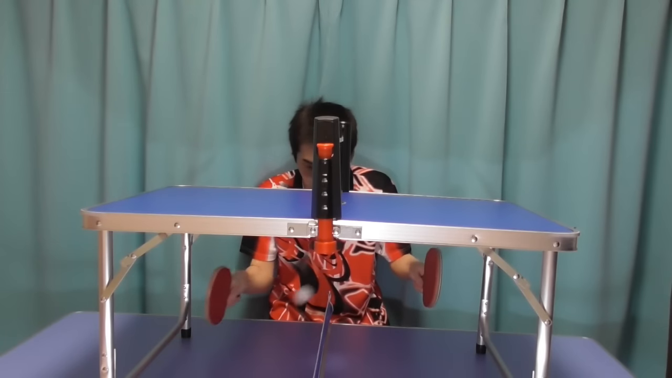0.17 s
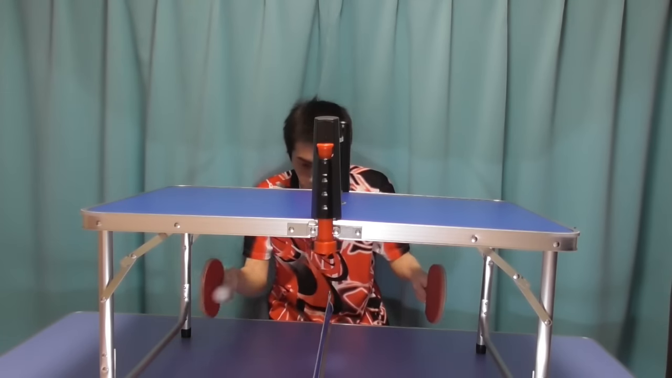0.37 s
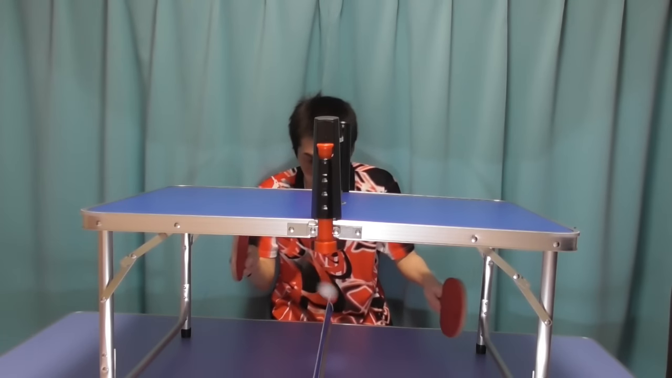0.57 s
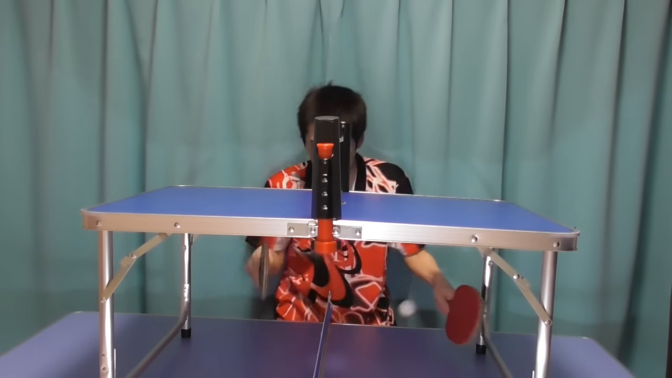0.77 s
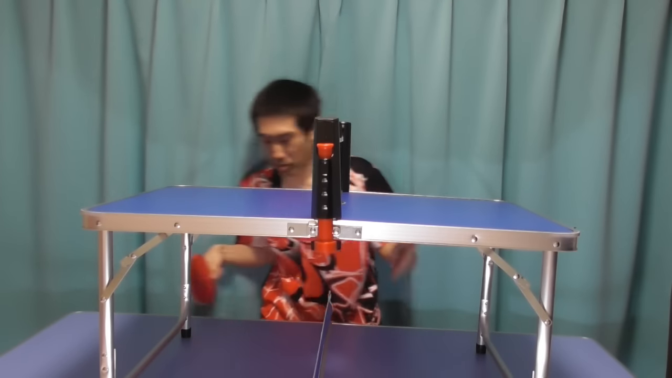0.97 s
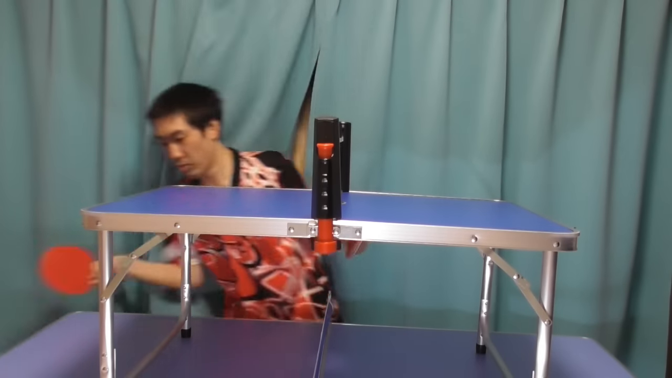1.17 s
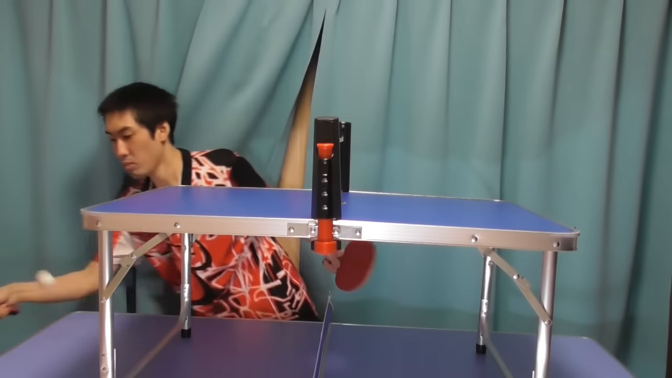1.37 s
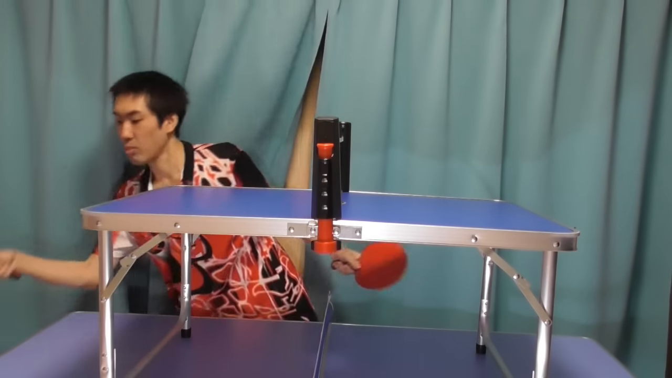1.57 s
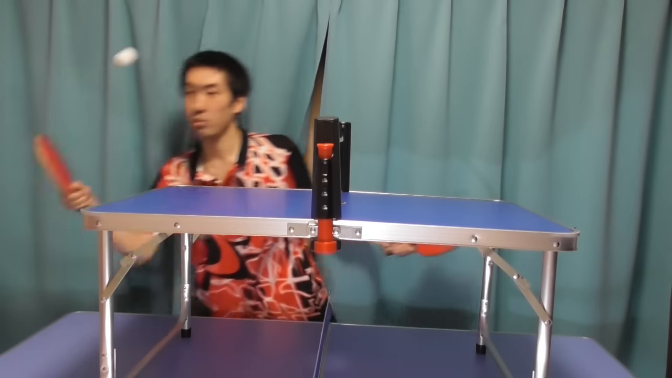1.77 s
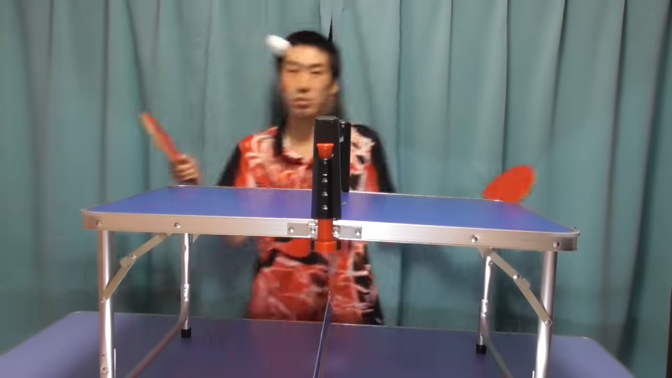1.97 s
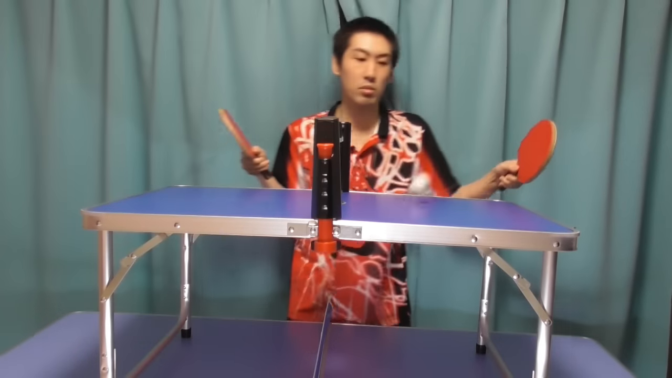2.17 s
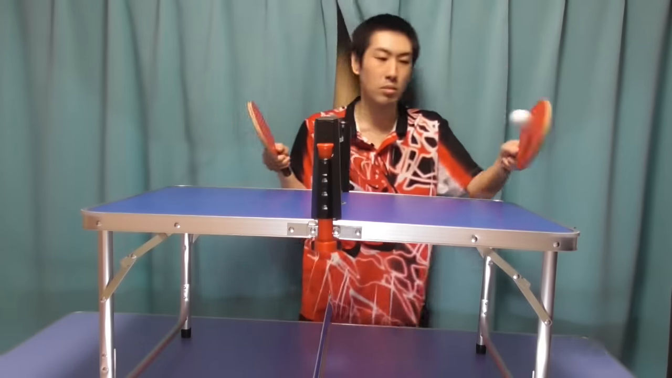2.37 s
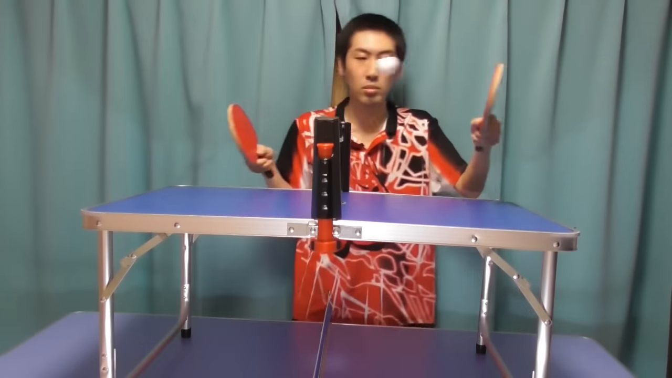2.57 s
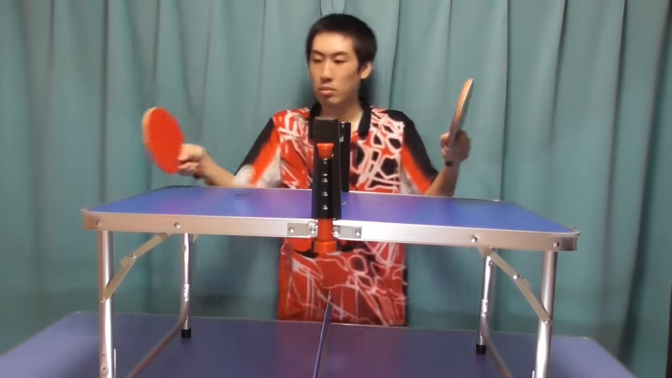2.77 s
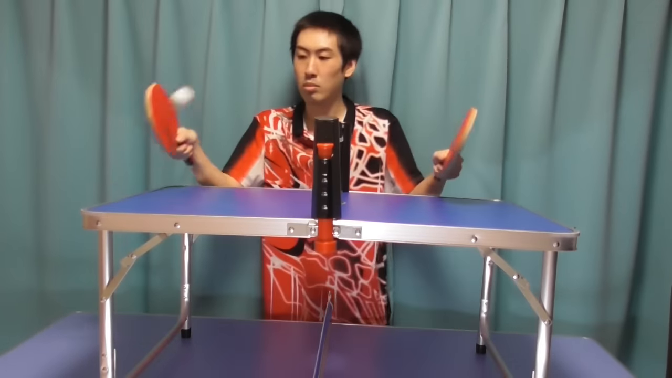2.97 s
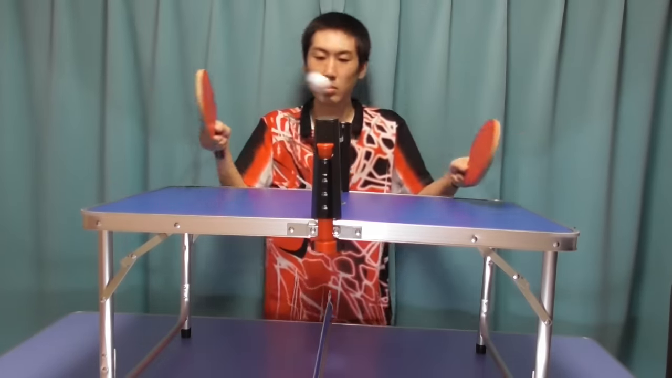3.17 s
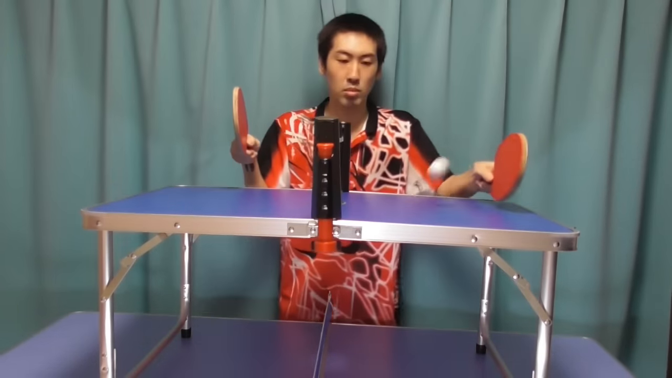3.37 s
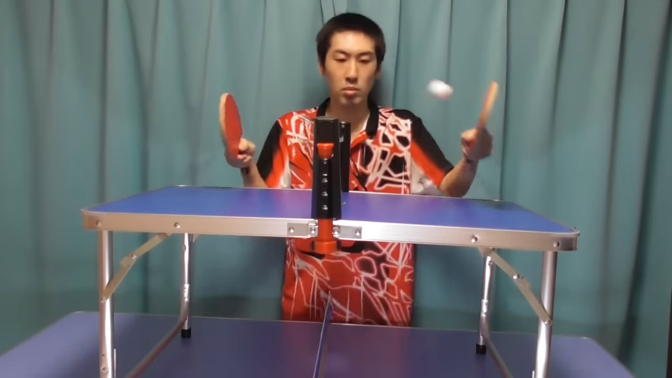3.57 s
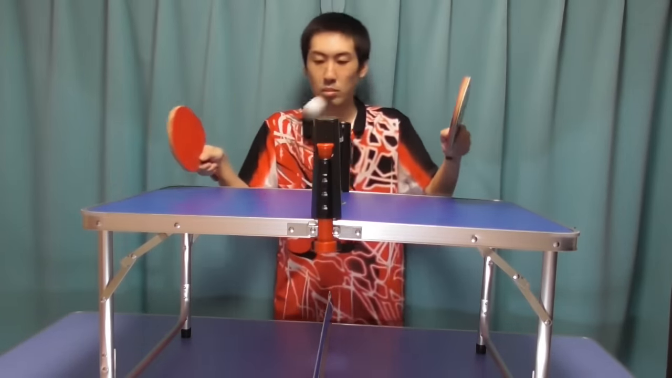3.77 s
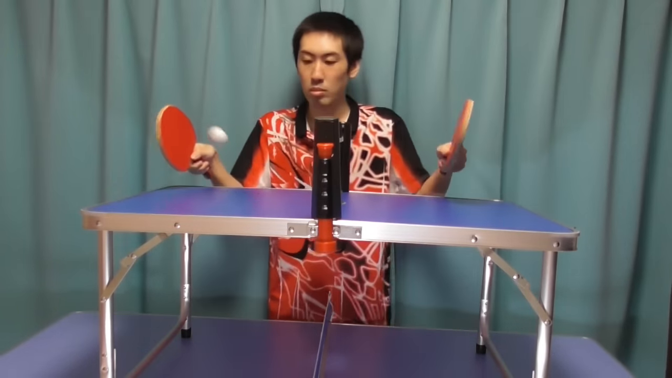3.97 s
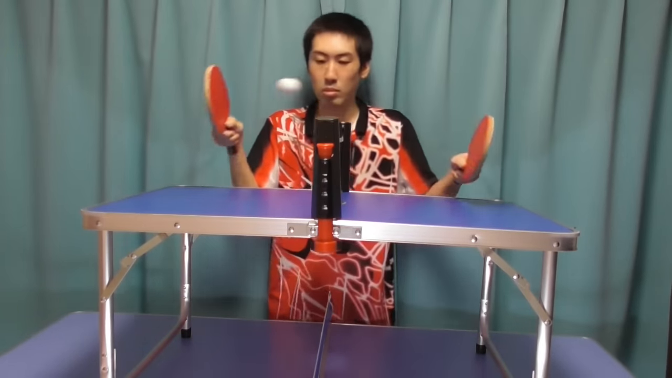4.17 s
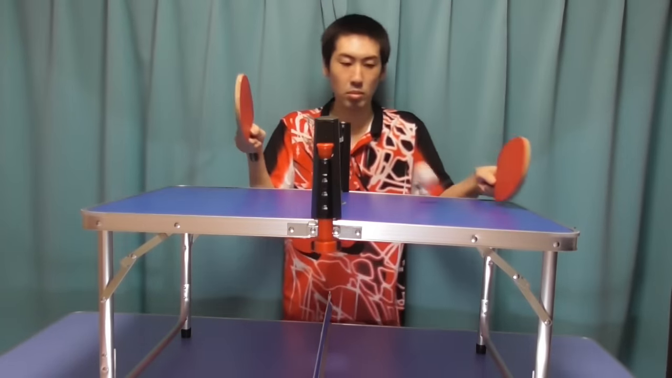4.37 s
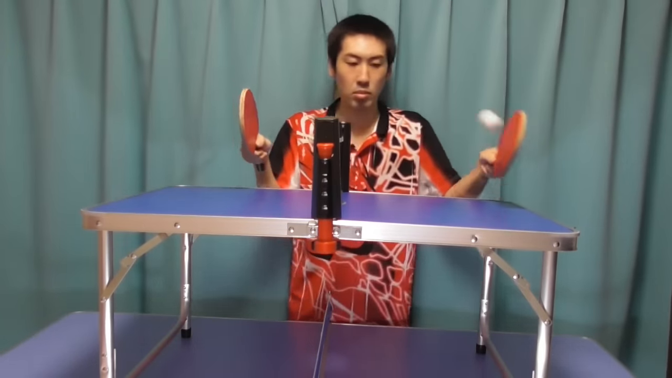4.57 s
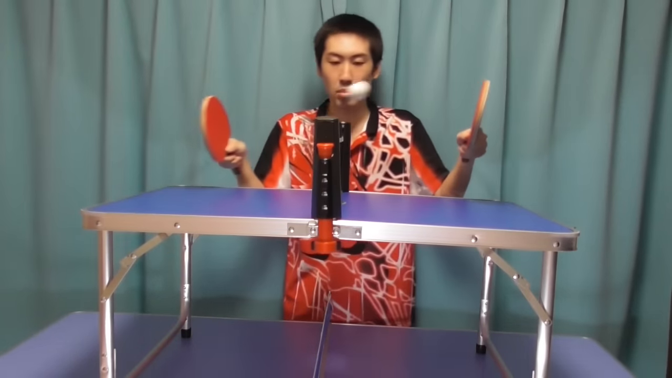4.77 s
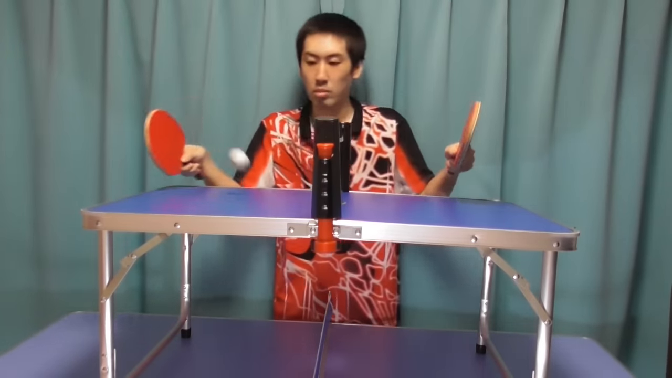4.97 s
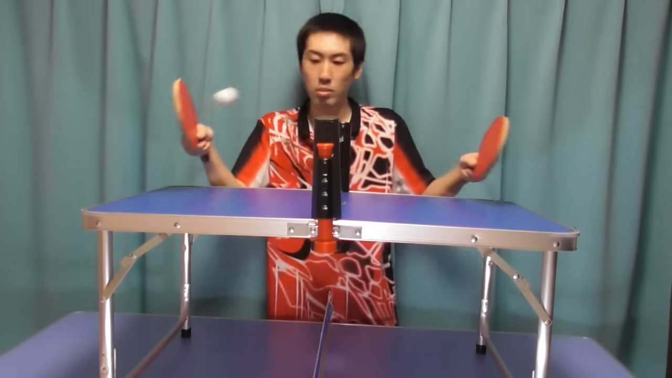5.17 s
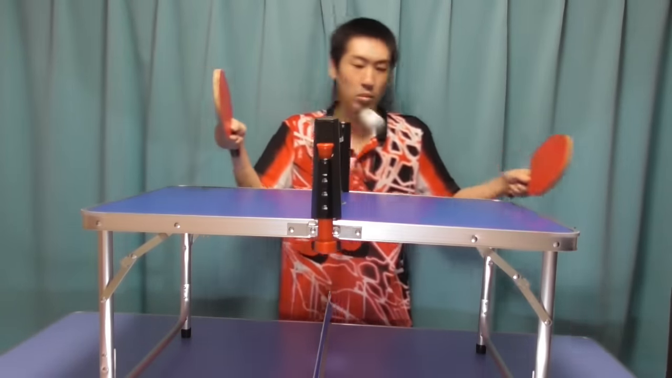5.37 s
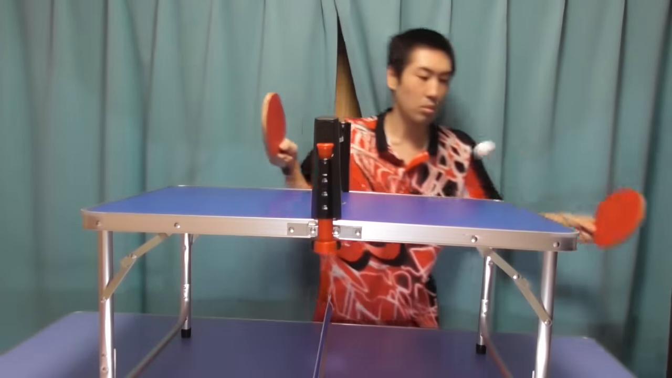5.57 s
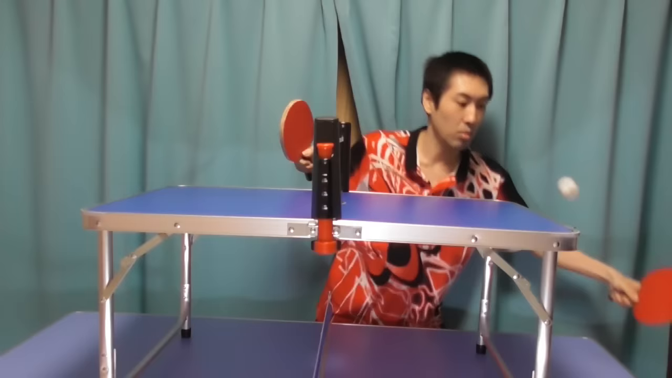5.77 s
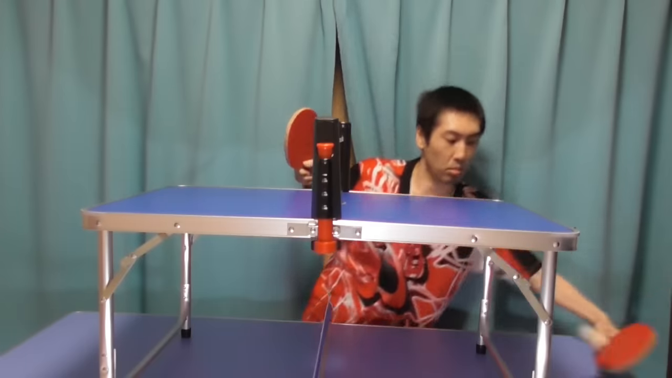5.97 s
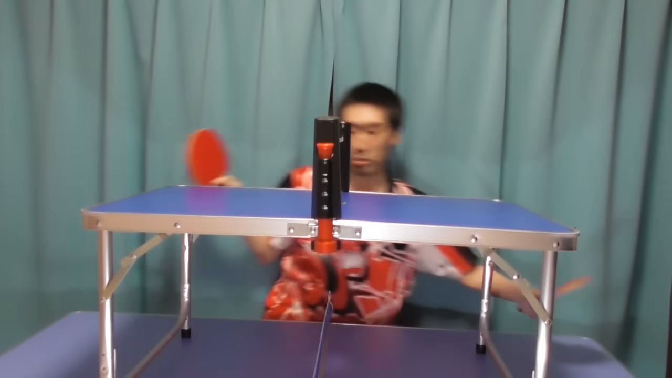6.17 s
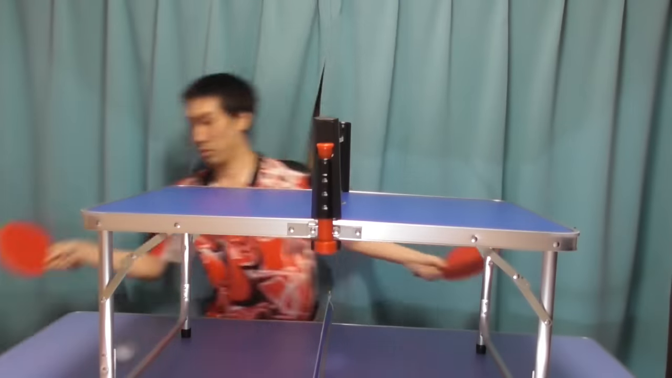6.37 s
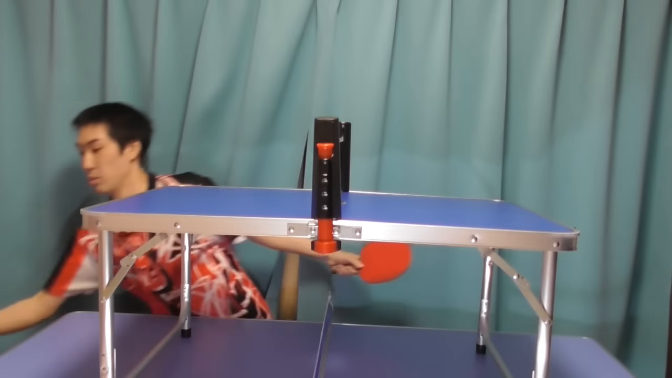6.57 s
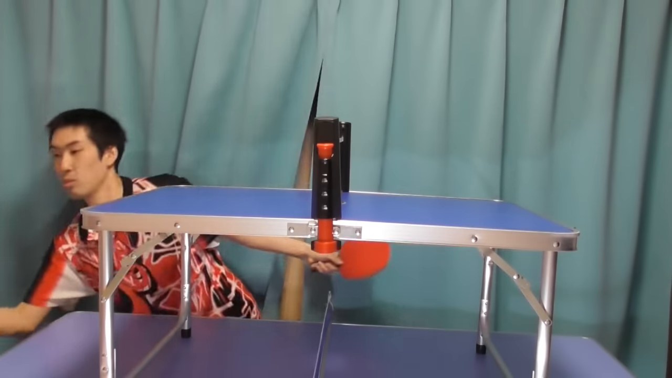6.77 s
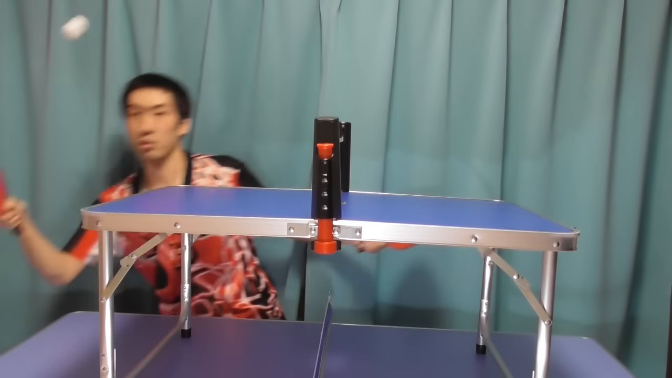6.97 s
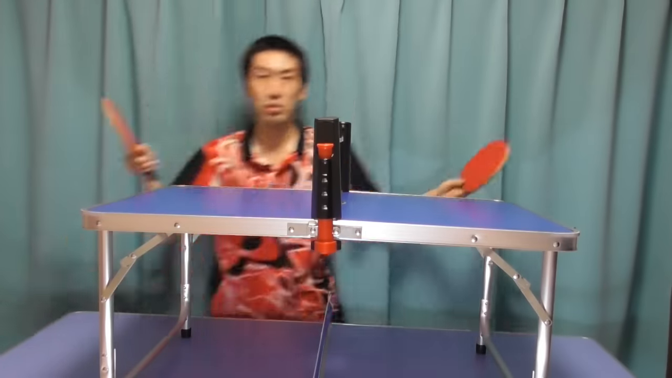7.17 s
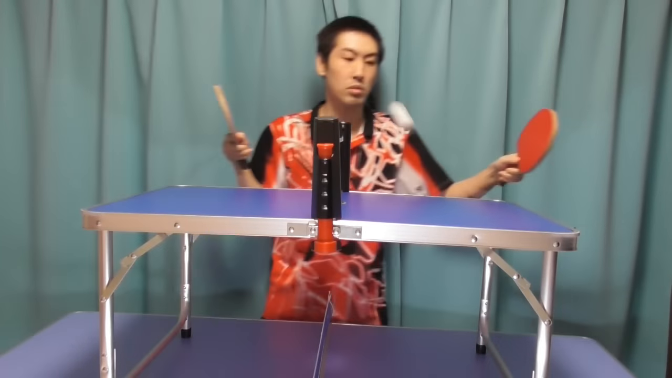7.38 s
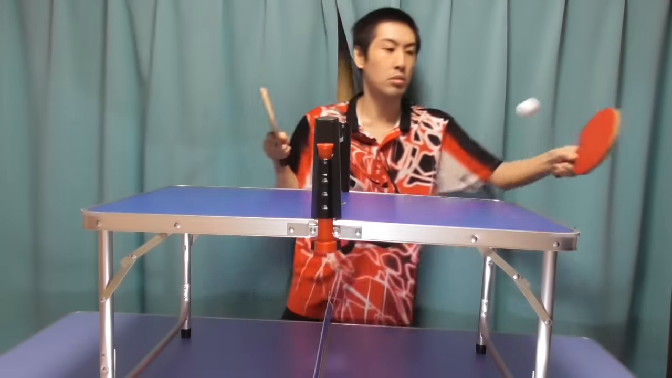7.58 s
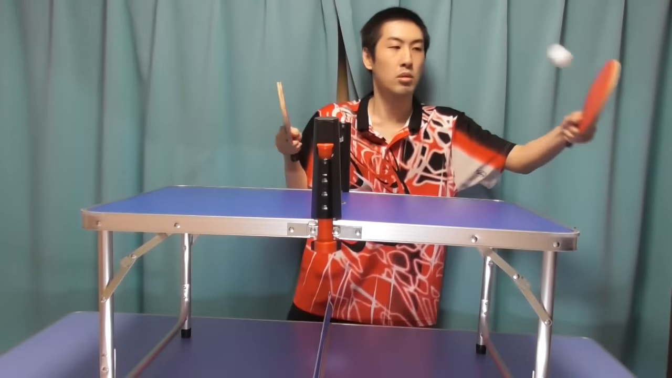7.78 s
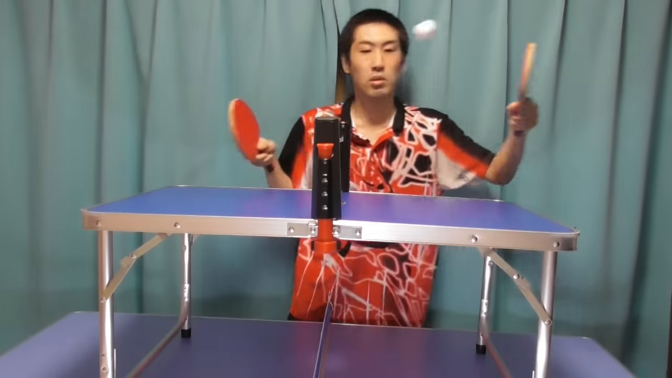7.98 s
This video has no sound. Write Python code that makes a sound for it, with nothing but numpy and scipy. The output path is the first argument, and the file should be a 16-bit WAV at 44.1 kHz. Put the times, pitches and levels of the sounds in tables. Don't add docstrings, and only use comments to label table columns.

```python
import sys
import numpy as np
from scipy import signal
from scipy.fft import rfft, irfft, next_fast_len
from scipy.io import wavfile
from scipy.ndimage import uniform_filter1d, map_coordinates

SR = 44100
rng = np.random.default_rng(int(sys.argv[2]) if len(sys.argv) > 2 else 0)


def natural_amplitude(level_db):
    exponent = np.asarray(level_db, float) / 20
    return 10 ** exponent


def to_wav(sig):
    pcm = np.clip(np.atleast_2d(sig), -1, 1) * 32767
    pcm = np.round(pcm).astype(np.int16)
    wavfile.write(sys.argv[1], SR, pcm.T)


N = 354108
SPAN = SR // 2
T = np.arange(SPAN) / SR


def along(points, hz):
    f, v = np.transpose(points)
    return np.interp(np.log(hz + 1), np.log(f + 1), v)


def unit(x, seconds=None):
    head = x[..., :int(seconds * SR)] if seconds else x
    return x / np.sqrt(np.mean(head ** 2) + 1e-20)


def noise(spectrum, alike, size):
    hz = np.fft.rfftfreq(size, 1 / SR)
    turn = np.arccos(np.clip(along(alike, hz), -1, 1)) / 2
    white = rfft(rng.standard_normal((2, size)))
    coloured = white * natural_amplitude(along(spectrum, hz))
    mid, side = irfft(coloured * [np.cos(turn), np.sin(turn)], size)
    return unit(np.array([mid + side, mid - side]))


def wobble(rate):
    knots = rng.standard_normal(int(N * rate / SR) + 4)
    return map_coordinates(knots, [np.arange(N) * rate / SR])


# frequency in Hz, level in dB per Hz.
AIR_SPECTRUM = [(15, -48), (25, -19.5), (70, -11.5), (144, -1.5), (169, -20.5), (210, -9), (274, -17),
                (583, -13), (1710, -33.5), (2070, -34.5), (3840, -44), (4760, -49), (15600, -31.5)]
# frequency in Hz, likeness (1 = the same).
AIR_LIKENESS = [(60, 0.82), (600, .6), (1500, 1), (6000, 0.41), (9000, 1), (15000, .2)]
# frequency in Hz, level in dB per Hz.
QUIET_TOP = [(15900, -60), (17000, -120)]


def still_air():
    return natural_amplitude(-62.5) * noise(list(AIR_SPECTRUM) + QUIET_TOP, AIR_LIKENESS, N)


# frequency in Hz, level in dB per Hz.
LENS_SPECTRUM = [(1500, -34), (2050, 8), (2800, -20), (3800, 3.5), (4500, -6.5), (5200, -39)]


def lens():
    fields_per_s, tick_width, bed = 59.94, .2, .3
    field = (np.arange(N) / SR - .0003) * fields_per_s
    tick = np.exp(-((field % 1 - .5) / tick_width) ** 2)
    weak_turn = natural_amplitude(-4 * (field // 1 % 2))
    return natural_amplitude(-74.5) * (bed + tick * weak_turn) * noise(LENS_SPECTRUM, [(20, 1.0)], N)


# time in seconds, cloth level in dB.
EFFORT_CURVE = [(0.74, -82.5), (0.92, -69.5), (1.29, -65), (1.61, -76.5), (1.95, -74), (2.2, -61),
                (2.57, -79), (3.09, -74), (3.62, -80.5), (5.07, -80.5), (5.75, -68.5), (5.97, -78),
                (6.28, -66), (6.84, -77.5), (7.15, -76.5), (7.28, -66.5), (7.62, -65.5), (7.85, -74)]
# frequency in Hz, level in dB per Hz.
CLOTH_SPECTRUM = [(1200, -32), (2000, -9.5), (3700, -10.5), (4900, -20.5), (7900, -4.5), (11000, -16),
                  (15550, -23.5)]
# frequency in Hz, level in dB per Hz.
BODY_SPECTRUM = [(60, -3), (150, -2), (430, -8.5), (900, -8), (1400, -15), (2000, -42)]
# frequency in Hz, likeness (1 = the same).
ROOM_LIKENESS = [(60, 0.95), (200, 0.92), (700, 0.85), (1500, 1), (3000, .9), (5000, 1), (8000, 0.86),
                 (15000, 0.13)]


def shirt():
    t = np.arange(N) / SR
    effort_db = np.interp(t, *np.transpose(EFFORT_CURVE))

    z = signal.stft(noise(list(CLOTH_SPECTRUM) + QUIET_TOP, ROOM_LIKENESS, N), nperseg=256)[2]
    patches = uniform_filter1d(rng.standard_normal(z.shape[1:]), size=10, axis=0)
    patches = unit(uniform_filter1d(patches, size=8, axis=1))
    cloth = unit(signal.istft(z * natural_amplitude(2.5 * patches), nperseg=256)[1][:, :N])

    lead_s, swing_s = .04, .05
    swings = natural_amplitude(-63.5) * sum(np.exp(-((t - row[0] + lead_s) / swing_s) ** 2) for row in RETURNS)

    shuffle = natural_amplitude(-66.5 + 0.81 * (effort_db - effort_db.mean()))
    body = (shuffle + swings) * natural_amplitude(3.1 * wobble(11)) * noise(BODY_SPECTRUM, AIR_LIKENESS, N)
    return natural_amplitude(effort_db + 4.5) * cloth + body


def ring(modes, t60, attack):
    scatter_db, retune = 2.5, .006
    hz, db = np.transpose(modes)[:, :, None]
    strength, tuning = rng.standard_normal((2, len(modes), 1))
    fading = natural_amplitude(db + scatter_db * strength - 60 * T / t60)
    tones = fading * np.sin(2 * np.pi * hz * (1 + retune * tuning) * T)
    return tones.sum(0) * (1 - np.exp(-T / attack))


# frequency in Hz, seconds to fade by 60 dB.
SHELL_FADE = [(6000, .008), (8740, .011), (9750, .008), (11000, .005), (15000, .004)]


def shell(modes, attack):
    return ring(modes, along(SHELL_FADE, np.transpose(modes)[0])[:, None], attack)


def wood(modes, t60, attack):
    band = signal.butter(4, (300, 1400), "bandpass", fs=SR, output="sos")
    return signal.sosfilt(band, ring(modes, t60, attack))


# frequency in Hz, level in dB per Hz.
CRACK_SPECTRUM = [(300, -33.5), (1300, -12), (2000, 0.5), (2700, -8), (3400, 1), (5000, -7), (7500, 3.5),
                  (10500, -3.5), (13000, -10), (16500, -23.5)]


def crack():
    cepstrum = irfft(np.log(natural_amplitude(along(CRACK_SPECTRUM, np.fft.rfftfreq(SPAN, 1 / SR)))), SPAN)
    cepstrum[1:SPAN // 2] *= 2
    cepstrum[SPAN // 2 + 1:] = 0
    snap = irfft(np.exp(rfft(cepstrum)), SPAN)
    buckle, echo = (SR * rng.uniform([.0006, .0014], [.001, .0024])).astype(int)
    light = natural_amplitude(-14) * snap
    return light - np.pad(snap, (buckle, 0))[:SPAN] + np.pad(light, (echo, 0))[:SPAN]


# frequency in Hz, seconds to fade by 60 dB.
ROOM_FADE = [(100, 0.4), (400, 0.18), (1100, 0.19), (3000, 0.19), (8000, 0.12), (14000, 0.077)]
# frequency in Hz, level in dB.
WALL_SPECTRUM = [(200, 2.5), (1000, 1), (3000, -2), (9000, -7.5), (15000, -2)]


def tail():
    hz, t, z = signal.stft(noise(WALL_SPECTRUM, ROOM_LIKENESS, SPAN), SR, nperseg=128)
    decay = natural_amplitude(-60 * t / along(ROOM_FADE, hz)[:, None])
    answer = signal.istft(z * decay, SR, nperseg=128)[1][:, :SPAN]
    answer = answer * np.clip((T - .001) / 0.0012, 0, 1)
    return answer / np.linalg.norm(answer[0])


def heard(layers, wet_db, pan_db):
    answer = natural_amplitude(wet_db) * tail()
    answer[:, 0] += natural_amplitude([pan_db / 2, -pan_db / 2])
    total = 0
    for x, db, seconds in layers:
        in_room = signal.fftconvolve(x[None], answer, axes=1)[:, :SPAN]
        total = total + natural_amplitude(db) * unit(in_room, seconds)
    return total


def add(track, s, sound):
    track[:, SPAN + round(s * SR):][:, :SPAN] += sound


# start in seconds, blade level in dB, shell level in dB,
# left-right balance in dB, struck spot's pitch in Hz.
RETURNS = [(0.4152, -43, -43.5, -1, 690), (0.8945, -40.5, -37.5, -3, 960), (1.6048, -29.5, -31, 5, 742),
           (2.4276, -39.5, -40.5, -4, 744), (2.9859, -40.5, -42.5, 1, 716),
           (3.539, -40.5, -43.5, -3.5, 788), (4.0838, -40.5, -40.5, 2.7, 706),
           (4.5852, -40.5, -44, -3.5, 774), (5.1594, -41, -41, -1.5, 726), (6.0039, -33.5, -24, -4.5, 935),
           (6.7833, -26, -29.5, 4, 779), (7.757, -37, -39, -4, 1235)]
EARLIER_RETURN = [
    (-.03, -42, -44, 0, 820),
]
# frequency in Hz, level in dB.
LOW_SHELL = [(6550, -5), (7000, 0), (7350, 4), (7820, 2)]
# frequency in Hz, level in dB.
HIGH_SHELL = [(8350, -9), (8740, -2.5), (9750, -3.5), (10400, -6.5), (11000, -3.5), (11900, -2),
              (12500, -8), (13100, -9.5), (14000, -23), (15000, -19)]
# frequency in Hz, level in dB.
BLADE_MODES = [(500, -9), (630, -0.5), (750, 8.5), (890, 2), (1060, 2), (1200, 0.5), (1330, -10)]
# blade level in dB, seconds to fade by 60 dB.
RUBBER_FADE = [(-39, .013), (-29, .04)]


def paddles():
    track = np.zeros((2, N + 2 * SPAN))
    for s, blade_db, high_db, pan_db, spot_hz in EARLIER_RETURN + list(RETURNS):
        t60 = np.interp(blade_db, *np.transpose(RUBBER_FADE))
        blade = [(hz, db - 1100 * t60 * np.log2(hz / spot_hz) ** 2) for hz, db in BLADE_MODES]
        layers = [(shell(LOW_SHELL, 0.0012), high_db - 29, .01),
                  (shell(HIGH_SHELL, 0.0007), high_db, .01),
                  (crack(), (blade_db + high_db) / 2 - 13, .01),
                  (wood(blade, t60, 0.0016), blade_db, .03)]
        add(track, s, heard(layers, 0.85, 0.76 * pan_db))
    return track[:, SPAN:-SPAN]


# start in seconds, board level in dB, low shell level in dB,
# high shell level in dB, panel level in dB.
TABLE_BOUNCES = [(0.306, -24, -31.5, -25, -31.5), (0.7253, -26, -38, -22.5, -39),
                 (1.3394, -20.5, -42, -25, -37.5), (2.2081, -20.5, -20, -22, -35.5),
                 (2.826, -24, -15, -21, -38), (3.3775, -20, -22.5, -23.5, -38.5),
                 (3.9272, -23, -16.5, -22.5, -33.5), (4.4422, -22.5, -18.5, -23, -35),
                 (4.977, -22.5, -15.5, -22.5, -34), (5.5209, -22.5, -17.5, -21, -35.5),
                 (6.4272, -24, -62, -23, -36), (7.4854, -19, -18, -22.5, -34.5)]
# time in seconds, peak level in dB.
AIR_SHOVES = [
    (.7259, -3),
    (2.8278, -3.5),
]
# frequency in Hz, level in dB.
BOARD_MODES = [(420, -13.5), (510, -5), (590, -3), (660, 0.5), (750, 2.5), (870, 3), (980, -3.5),
               (1150, -0.5), (1290, -4)]
# frequency in Hz, level in dB.
PANEL_MODES = [(244.75, -0.5), (260.3, -9), (195.3, -9.5), (308.6, -9)]
# frequency in Hz, level in dB.
LEG_MODES = [(55, -7.5), (68, -5.5), (100, -10), (133, -6), (141, 2), (149, -3.5)]


def table():
    track = np.zeros((2, N + 2 * SPAN))
    for s, board_db, low_db, high_db, panel_db in TABLE_BOUNCES:
        layers = [(shell(LOW_SHELL, 0.0012), low_db - 4.5, .01),
                  (shell(HIGH_SHELL, .0004), high_db + 1.5, .01),
                  (crack(), (board_db + high_db) / 2 - 3.5, .01),
                  (wood(BOARD_MODES, .018, 0.0031), board_db, .03)]
        add(track, s, heard(layers, 2.2, 0))
        hum = [(ring(PANEL_MODES, 0.3, 0.0084), panel_db, .06),
               (ring(LEG_MODES, 0.47, 0.0028), -39, .06)]
        add(track, s, heard(hum, -10, 0))
    for s, db in AIR_SHOVES:
        add(track, s - .002, -natural_amplitude(db) * np.exp(-((T - .002) / 0.00028) ** 2))
    return track[:, SPAN:-SPAN]


# start in seconds, thud level in dB, knock level in dB, scuff level in dB.
BODY_BUMPS = [
    (1.04, -46, -41.5, -53.5),
    (1.91, -46, -68, -60),
    (4.727, -60, -67.5, -61),
    (4.759, -52, -49.5, -68.5),
    (5.239, -59, -62.5, -64.5),
    (5.807, -52, -51, -72),
    (6.317, -43.5, -53.5, -68),
    (6.988, -56.5, -70, -68.5),
    (7.194, -52, -44.5, -58),
]
# frequency in Hz, level in dB.
FLOOR_MODES = [(45, 0.5), (62, -2.5), (90, -3)]


def bumps():
    track = np.zeros((2, N + 2 * SPAN))
    for s, thud_db, knock_db, scuff_db in BODY_BUMPS:
        scuff = noise(list(CLOTH_SPECTRUM) + QUIET_TOP, ROOM_LIKENESS, SPAN)
        scuff = scuff * natural_amplitude(-60 * T / 0.21) * (1 - np.exp(-T / 0.0015))
        dull = [(ring(FLOOR_MODES, 0.062, .003), thud_db - 15, .02),
                (wood(BOARD_MODES, .009, 0.0037), knock_db - 13.5, .02)]
        add(track, s, heard(dull, 0, 0) + natural_amplitude(scuff_db - 3.5) * scuff)
    return track[:, SPAN:-SPAN]


def scene():
    return still_air() + lens() + shirt() + paddles() + table() + bumps()


def dips_before_blows():
    step_s, first_step_s, wake_s = 1024 / 48000, .0142, .0052
    t = np.arange(N) / SR
    blows = [(row[0], -28) for row in TABLE_BOUNCES]
    blows += [(row[0], -15) for row in RETURNS if row[2] > -38]
    gain_db = np.zeros(N)
    for s, db in blows:
        start = s - (s - first_step_s) % step_s
        end = s - wake_s
        if end > start:
            gain_db += db * np.clip(np.minimum(t - start, end - t) / .001 + 1, 0, 1)
    return gain_db


def band_limit(x):
    return signal.sosfilt(signal.butter(12, 16670, fs=SR, output="sos"), x)


# frequency in Hz, left-right balance in dB.
PORT_BALANCE = [(60, 1.5), (180, -3), (550, 0.5), (1650, 2), (4970, 0.0), (15000, 0.5)]
# frequency in Hz, level in dB.
TOP_EDGE = [(16400, 0), (16900, -60)]


def record(dry):
    size = next_fast_len(N + 4096)
    hz = np.fft.rfftfreq(size, 1 / SR)
    colour = natural_amplitude(along(TOP_EDGE, hz) + np.outer([.5, -.5], along(PORT_BALANCE, hz)))
    ported = irfft(rfft(dry, size) * colour, size)[:, :N]
    ceiling = .93
    held = ported / (1 + abs(ported / ceiling) ** 8) ** (1 / 8)
    return band_limit(held * natural_amplitude(dips_before_blows()))


dry = scene()
out = record(dry)
to_wav(out)
```